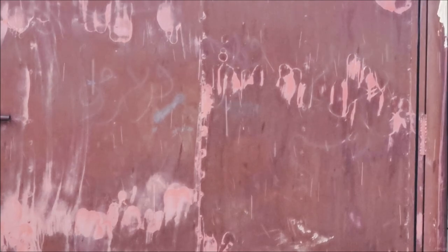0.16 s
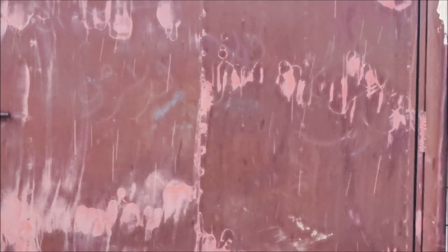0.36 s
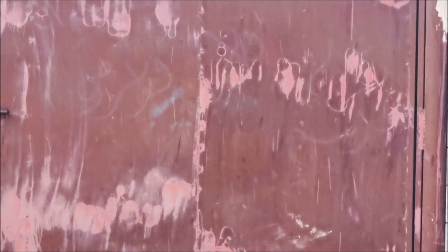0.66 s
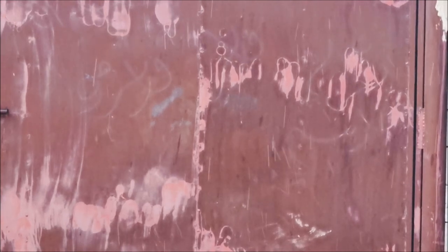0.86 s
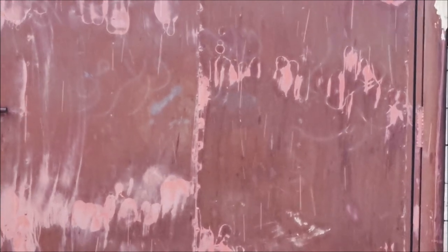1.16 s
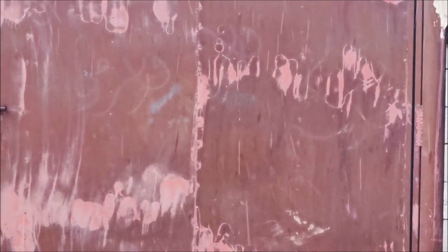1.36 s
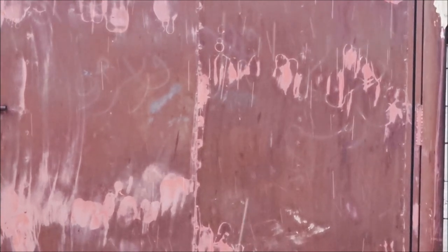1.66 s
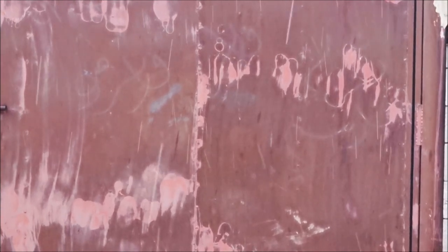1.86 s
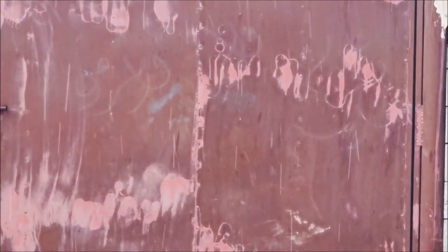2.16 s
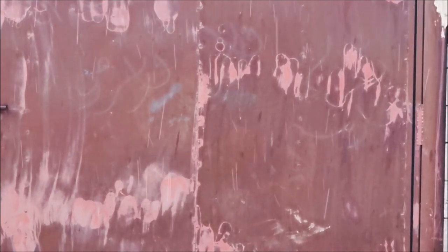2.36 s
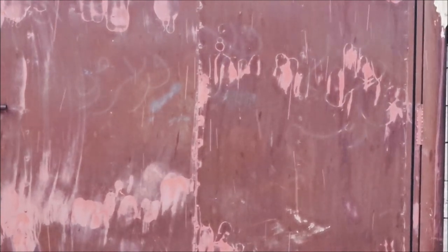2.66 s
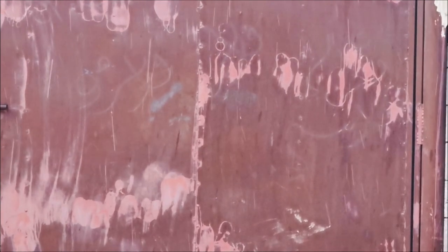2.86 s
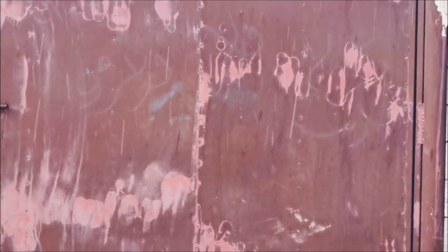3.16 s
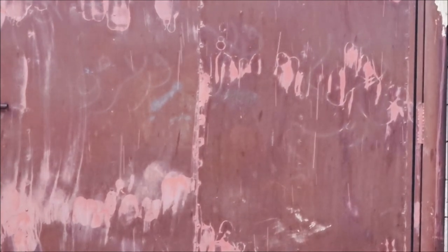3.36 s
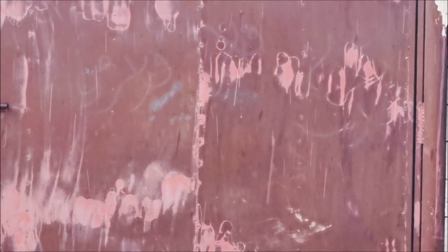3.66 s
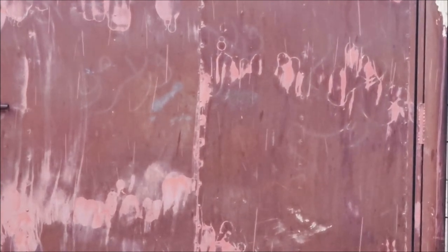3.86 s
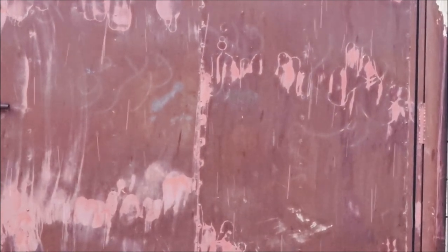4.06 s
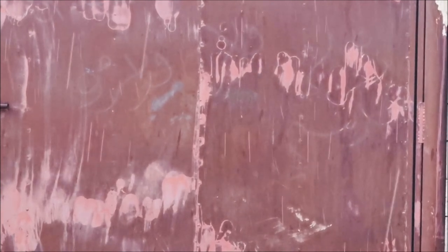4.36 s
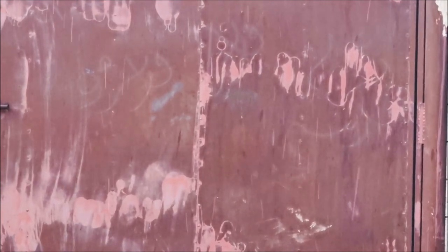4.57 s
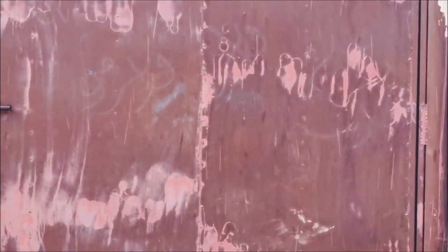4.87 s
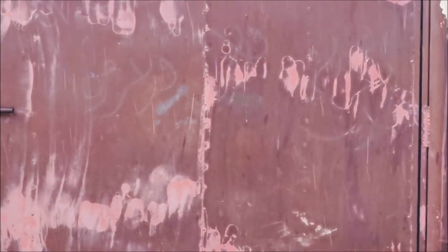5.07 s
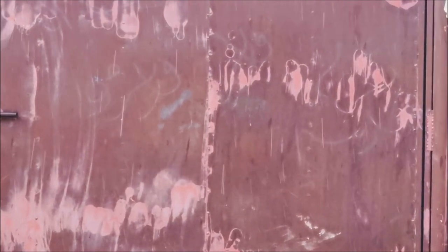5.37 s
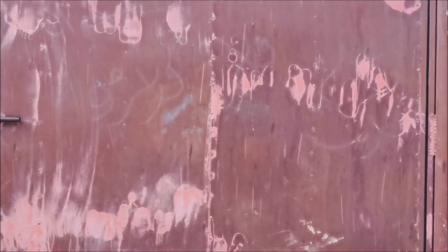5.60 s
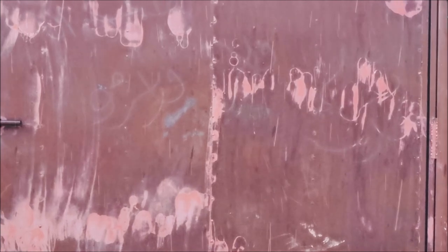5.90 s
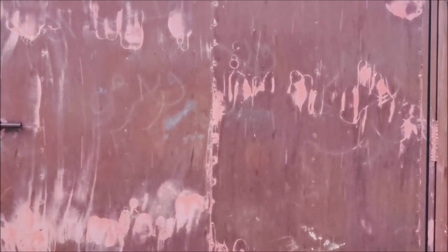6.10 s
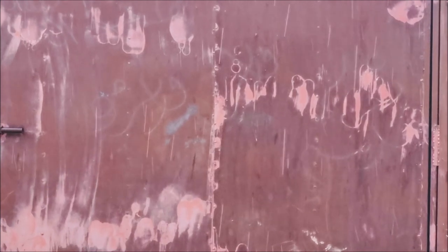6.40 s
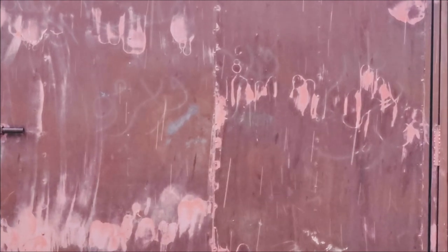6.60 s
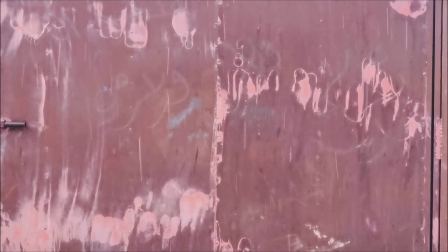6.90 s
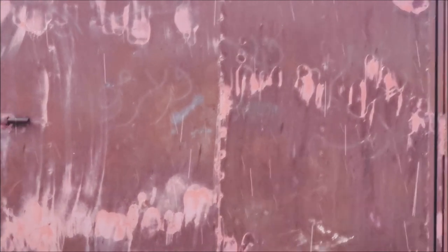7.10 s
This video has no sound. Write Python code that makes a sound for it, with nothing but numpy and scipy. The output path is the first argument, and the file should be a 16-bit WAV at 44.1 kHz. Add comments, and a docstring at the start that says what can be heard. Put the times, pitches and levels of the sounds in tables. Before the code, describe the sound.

Rain strikes a large metal sheet outdoors, close to a stereo microphone. Dense small drops splatter in uneven surges while larger ones drum, ping and thud. Soft wind rumbles on the microphone and a few thin chirps pass faintly behind. The rain drifts from the right towards the front, gaining a metallic sizzle and deeper drumming, then stops abruptly after about seven seconds.

```python
"""A burst of rain patters on a large metal sheet, close to a stereo microphone outdoors. Dense small drops
splat and come in lashes, larger ones drum the sheet's resonances, and single drops ping or thud, with
a slap off a nearby wall. The rain drifts from the side towards the front. Wind rumbles on the
microphone ports, a few thin chirps pass over a faint wash and hum, and everything stops abruptly."""
import sys
import numpy as np
from scipy import signal
from scipy.fft import rfft, irfft, next_fast_len
from scipy.io import wavfile
from scipy.ndimage import uniform_filter1d, map_coordinates

SR = 44100
rng = np.random.default_rng(int(sys.argv[2]) if len(sys.argv) > 2 else 0)


def wrap_up_sound(samples):
    """Save the sound to the file named by the first command line argument, as 16-bit audio."""
    columns = np.atleast_2d(samples).T
    # keep every value between -1 and 1, then stretch to whole-number steps
    tamed = np.clip(columns, -1, 1)
    steps = np.round(tamed * 32767).astype(np.int16)
    wavfile.write(sys.argv[1], SR, steps)


N = 319398
TIME = np.arange(N) / SR
STOP_S = 7.13

# spectrum of the open air around the microphone: f/Hz, level/dB
AIR_SPECTRUM = [(30, 5), (90, 1.5), (140, -4.5), (190, -2), (250, -7), (330, -5), (600, -13), (1500, -11),
                (8000, -30.5)]
# a low hum that swells and fades: t/s, level/dB
HUM_LEVEL = [(0, -74), (.25, -54.5), (.55, -49), (.7, -61), (1.1, -59), (1.8, -62.5), (2.3, -58.5),
             (3, -62.5), (5, -61), (7.1, -74)]
# wind on the microphone: t/s, level/dB
WIND_LEVEL = [(0.0, -41.5), (0.9, -41.5), (1.02, -39.5), (1.14, -30.5), (1.22, -41), (1.6, -46.5),
              (2.2, -52), (3.7, -58), (5.3, -59), (5.85, -44), (6.4, -51.5), (7.1, -47)]
# spectrum of the wind's rumble at the ports: f/Hz, level/dB
WIND_SPECTRUM = [(10, -14), (30, 0.5), (55, -5), (90, -14.5), (150, -28), (400, -60.5), (1500, -100)]
# thin chirps: t/s, length/s, start f/Hz, middle f/Hz, end f/Hz, level/dB
CHIRPS = [(1.036, .062, 2560, 2760, 2670, -31), (1.09, .04, 2750, 2750, 2730, -42),
          (1.11, .07, 2560, 2330, 2290, -44), (2.575, .095, 1480, 1405, 1330, -40.5),
          (6.757, .055, 3100, 3060, 2970, -38.5), (6.808, .038, 2970, 2850, 2730, -38.5)]

# where the rain strikes: t/s, right-channel lag of patter/ms, of drumming/ms, turn (side 0, front 1)
RAIN_BEARING = [(0, 0.52, 0.62, 0.011), (2.7, 0.48, 0.57, 0.17), (4.3, 0.27, 0.32, 0.67),
                (5.2, 0.29, 0.28, 0.9), (6, 0.24, 0.21, 0.9), (7.1, 0.26, 0.3, 0.99)]
# lashes of rain thrown against the sheet: t/s, length/s, level/dB
RAIN_LASHES = [(0, 0.073, -41.5), (0.223, 0.044, -30.5), (0.636, 0.11, -32.5), (0.763, 0.11, -34.5),
               (0.908, 0.14, -34.5), (1.206, 0.38, -34), (2.313, 0.11, -43.5), (2.86, 0.24, -36),
               (3.297, 0.12, -35.5), (3.558, 0.23, -35), (3.918, 0.17, -32.5), (4.218, 0.059, -37),
               (4.49, 0.21, -37), (5.154, 0.28, -36), (5.862, 0.4, -39)]
# steady fall of large drops: t/s, level/dB
LARGE_DROP_LEVEL = [(0.0, -40.5), (0.5, -41.5), (1.15, -42), (1.55, -40.5), (1.7, -34.5), (1.85, -40.5),
                    (2.1, -56), (2.8, -50.5), (2.95, -40.5), (3.02, -37), (3.2, -47), (3.85, -46.5),
                    (4.05, -39), (4.35, -42.5), (4.75, -40.5), (5.2, -38.5), (5.7, -45.5), (6.2, -43.5),
                    (6.8, -48), (7.1, -50.5)]
# modes of the wet sheet, to the side of the microphone and in front: f/Hz, width/Hz, level/dB
SIDE_MODES = [(144, 73, -13), (348, 120, -6.5), (494, 59, 4), (700, 220, -6), (1270, 500, -9)]
FRONT_MODES = [(144, 72, -11.5), (329.7, 57, -3), (466, 46, 3), (678, 167, -3), (1280, 460, -6.5)]
# the loudest heavy drops that flex the sheet: t/s, level/dB, f/Hz, t60/s, relative clang/dB
HEAVY_DROPS = [(1.676, -25, 458, 0.086, 21), (3.403, -27, 480, 0.084, -9), (3.414, -18.5, 478, 0.042, -12),
               (3.479, -33, 433, 0.081, -21), (3.511, -30, 500, 0.036, -14), (3.546, -32, 484, 0.052, -18),
               (3.704, -29, 646, 0.07, -16), (3.869, -24, 453, 0.015, -13), (4.0095, -18.5, 560, 0.024, 8),
               (4.030, -26, 600, 0.021, 3), (4.677, -43, 468, 0.024, -15), (4.791, -33, 470, 0.037, -14),
               (5.002, -28, 336, 0.064, 14), (5.076, -19.5, 510, 0.021, -4), (5.138, -18, 480, 0.013, -2),
               (5.181, -27, 334, 0.047, -11), (5.196, -26, 443, .04, -12), (5.261, -19, 366, 0.02, -15),
               (5.418, -34, 400, 0.023, 5), (5.436, -21.5, 490, 0.027, 3), (5.950, -29, 477, 0.043, -12),
               (6.025, -27.5, 470, 0.042, -9), (6.126, -28, 447, 0.056, 5),
               (6.127, -18.5, 1095, 0.034, -12), (6.152, -24, 1020, 0.036, 1), (6.176, -29, 633, 0.034, -9),
               (6.226, -30, 494, 0.063, -17), (6.274, -30.5, 489, 0.09, -17), (6.369, -28, 523, 0.029, -19),
               (7.101, -19.5, 434, 0.016, -21)]
# the loudest drops near the microphone; a few rows sound shortly after louder ones: t/s, level/dB, f/Hz, #
# contact hardness/dB, ring t60/s
NEAR_DROPS = [(.035, -20.5, 2770, -7, .015), (.058, -14, 2304, 2, 0.013), (.090, -19, 3420, 0.5, 0.019),
              (.1437, -20.5, 2170, 5, 0.0089), (.200, -22, 2600, 0.5, 0.013), (.254, -18.5, 3240, 0, 0.014),
              (.269, -15.5, 3020, -9, 0.014), (.296, -23.5, 2190, 3, 0.012),
              (.316, -17.5, 3300, 7.5, 0.0083), (.348, -20.5, 3260, -4, 0.013),
              (.372, -8, 1913, -4.5, 0.021), (.4275, -19, 2820, -2, 0.012), (.580, -21, 1600, 6, .014),
              (.604, -21, 2770, -5, .02), (.668, -16.5, 3210, 3.5, 0.0099), (.676, -22, 3580, 9.5, .01),
              (.686, -18, 4600, -1, .012), (.694, -19, 3100, 2.5, .012), (.715, -20.5, 3010, 6.5, 0.01),
              (.7404, -19.5, 2990, -6, 0.013), (.7785, -11, 2980, -7, 0.0087), (.795, -28.5, 3960, 1, 0.01),
              (.816, -17.5, 4750, 3, .012), (.821, -23.5, 3420, 5, 0.0087), (.843, -22.5, 4810, -2.5, .015),
              (.924, -21, 3240, 2, 0.011), (.973, -23.5, 3280, -3, 0.012), (1.043, -21.5, 4500, -5.5, .015),
              (1.153, -30, 2660, -11.5, 0.031), (1.198, -24, 2770, -9.5, 0.016),
              (1.2215, -18, 2080, -6.5, 0.025), (1.2245, -19, 2920, -1, .015), (1.277, -26, 3400, 6, .015),
              (1.308, -22, 3430, -2, .015), (1.508, -21.5, 2210, -1, 0.025),
              (1.615, -16.5, 2720, -0.5, 0.017), (1.676, -13.5, 2760, -9.5, .015),
              (1.785, -20.5, 3500, 3.5, 0.0084), (1.807, -23, 3460, 1.5, 0.017),
              (1.999, -27.5, 3440, -1, 0.011), (2.082, -17, 3280, -2.5, 0.0088),
              (2.1615, -21, 2690, -6, .018), (2.215, -23, 3470, -2, 0.019), (2.265, -26, 4320, 0.5, 0.0083),
              (2.315, -24.5, 2480, -5, .02), (2.334, -21, 1900, 4, 0.0088), (2.390, -20, 3420, -4, .018),
              (2.419, -21, 3350, 6.5, .015), (2.436, -27, 3010, 5, .008), (2.498, -17, 2240, 8, 0.0089),
              (2.650, -18.5, 2200, 7, 0.0088), (2.697, -18, 2900, 3, 0.013), (2.750, -29, 2650, -2, 0.018),
              (2.790, -22, 2790, -1, .015), (2.836, -22, 4630, -1, 0.014), (2.880, -14.5, 2850, 4, 0.012),
              (2.9523, -18, 3340, 2.5, .015), (3.012, -29, 2220, 2, .015), (3.074, -17.5, 3410, 5, 0.011),
              (3.193, -31, 3000, -5, 0.013), (3.324, -19, 3070, -2.5, 0.0084),
              (3.348, -17.5, 3490, 0, 0.014), (3.366, -22.5, 2920, 9, 0.011),
              (3.432, -20.5, 3310, 4, 0.024), (3.4515, -18.5, 3300, 6.5, 0.013),
              (3.570, -21, 2090, -6, .025), (3.5783, -24.5, 2560, 9, .012), (3.6656, -4, 6610, 0, 0.0064),
              (3.684, -16.5, 2130, -4, 0.02), (3.718, -15, 2700, 8.5, 0.0082), (3.756, -25, 2090, 10, .01),
              (3.969, -21, 4110, 5, .01), (4.115, -18, 4330, -0.5, .015), (4.2365, -18.5, 3880, 4, 0.0087),
              (4.250, -21, 4220, 2, 0.014), (4.360, -20, 4360, -12.5, 0.039), (4.4643, -22, 5010, 1, 0.011),
              (4.632, -19, 5270, -4, .015), (4.661, -21, 2600, 4.5, 0.02),
              (4.8115, -19.5, 4240, 2.5, 0.0058), (4.8205, -17.5, 2400, -0.5, 0.019),
              (5.196, -25.5, 5430, -1, 0.016), (5.2485, -22.5, 5760, -3.5, .018),
              (5.566, -16.5, 2130, 2, 0.014), (5.6495, -14, 5160, -4.5, .018),
              (5.662, -19, 4060, 3, 0.0073), (5.903, -17.5, 2160, -1, 0.019), (5.9405, -23, 2200, -4, .018),
              (6.147, -17.5, 5320, 0, 0.011), (6.180, -18, 2420, -1, .015), (6.2285, -16, 5400, 4.5, 0.01),
              (6.7305, -10.5, 2840, 1.5, 0.016), (6.7443, -15, 4270, 1.5, .013),
              (7.009, -22.5, 5230, -2, .018)]
# steady fall of small drops: t/s, level/dB
SMALL_DROP_LEVEL = [(0.0, -29), (0.55, -41), (1.15, -41.5), (1.75, -35.5), (2.0, -46.5), (2.6, -39),
                    (3.2, -35.5), (3.45, -35.5), (3.65, -34), (4.4, -38.5), (4.78, -37), (5.0, -36.5),
                    (5.6, -38), (5.83, -40.5), (6.4, -36), (6.9, -41.5), (7.1, -39)]
# colour of the patter from the side and from the front: f/Hz, left level/dB, right level/dB
SIDE_COLOUR = [(925, -17.5, -5.5), (1265, -2, -2), (1644, -15, -18.5), (1844, -1.5, -6), (2600, -18.5, -5),
               (2670, -15.5, 2), (3680, -15.5, 0.5), (3640, -14, -15), (4630, -0.5, -8), (5300, -30.5, 0),
               (6230, -8, -2.5), (8470, -12, -3), (8600, -28, -13.5)]
FRONT_COLOUR = [(830, -7.5, -16.5), (1338, -6.5, -2), (1570, -17.5, -10), (2150, -9.5, 3), (2660, -16, -7),
                (2800, -20, -7.5), (3700, -2, -2), (4030, -13.5, 0), (5300, -9, -7), (4860, -19.5, -8),
                (6630, -19.5, 4), (6500, -9, -2.5), (9000, -22, -7)]
# high modes of the sheet in front of the microphone: f/Hz, width/Hz, level/dB
SIZZLE_MODES = [(1091, 140, -1.5), (2685, 560, 2), (5426, 304, 6.5)]
# treble relative to the rest of the patter: t/s, level/dB
TREBLE_LEVEL = [(0, -1), (.4, -5.5), (.69, -3.5), (1.02, -4), (1.15, -19), (1.36, -2), (1.53, -2.5),
                (1.68, -9), (2.3, -7), (2.6, 2), (3.2, -3.5), (5.3, 1.5), (7.1, -1)]


def amp(db):
    """Decibels to gain."""
    return 10 ** (np.asarray(db) / 20)


def unit(x):
    """Scale to rms 1."""
    return x / np.sqrt(np.mean(x ** 2) + 1e-20)


def curves(rows):
    """One value per sample for each column after the time."""
    times, *columns = np.transpose(rows)
    return [np.interp(TIME, times, column) for column in columns]


def gains(spectrum, hz):
    """Gain for each dB column of a spectrum, read on a log axis."""
    knots_hz, *columns = np.transpose(spectrum)
    return amp([np.interp(np.log(hz + 1), np.log(knots_hz), column) for column in columns])


def wobble(rate):
    """A smooth random curve, rate knots a second."""
    return map_coordinates(rng.standard_normal(int(N * rate / SR) + 4), [TIME * rate])


def filtered(x, response):
    """Filter x by a response given as a function of frequency."""
    size = 2 * next_fast_len((N + SR // 2) // 2)
    return irfft(rfft(x, size) * response(np.fft.rfftfreq(size, 1 / SR)), size)[..., :N]


def above(hz, edge_hz, order=4):
    """Gain of a high-pass."""
    return np.sqrt(1 - 1 / (1 + (hz / edge_hz) ** (2 * order)))


def causal(gain):
    """The minimum-phase response with this gain: it rings only after a blow."""
    cepstrum = irfft(np.log(np.maximum(gain, 1e-5)))
    half = cepstrum.shape[-1] // 2
    fold = np.r_[1, np.full(half - 1, 2), 1, np.zeros(half - 1)]
    return np.exp(rfft(cepstrum * fold))


def resonances(modes, hz):
    """Response of a few damped modes; neighbours swing in opposite directions."""
    return sum((-1) ** k * amp(db) * 1j * hz * width / (centre ** 2 - hz ** 2 + 1j * hz * width)
               for k, (centre, width, db) in enumerate(modes))


def rings(starts, sizes, pitches, t60, samples):
    """One damped sine for each drop."""
    age = np.arange(samples) / SR
    decay = amp(-60 * age / np.reshape(t60, (-1, 1)))
    waves = sizes[:, None] * np.sin(2 * np.pi * pitches[:, None] * age) * decay
    where = (starts * SR).astype(int)[:, None] + np.arange(samples)
    return np.bincount(where.ravel(), waves.ravel(), N)[:N]


def shower(rate, size_db, pitch_hz, octaves, cycles, samples):
    """Random drops, rate a second: many small, few large, each ringing briefly at its own pitch."""
    when, rank, up, down = rng.random((int(rate * N / SR), 4)).T
    sizes = amp(size_db * np.minimum(-np.log(1 - rank), 3.5)) * rng.choice([-1, 1], len(when))
    pitches = pitch_hz * 2 ** (octaves * (up - down))
    return unit(rings(when * N / SR, sizes, pitches, cycles / pitches, samples))


def stray_drops(level, rate, over_db, scatter_db, pitch_hz, octaves, bright_db):
    """Single drops at random times, sized by the rain's level: t/s, level/dB, f/Hz, brightness/dB."""
    when, size, pitch, bright = rng.random((int(rate * STOP_S), 4)).T
    starts = when * STOP_S
    db = 20 * np.log10(np.interp(starts, TIME, level)) + over_db + scatter_db * (2 * size - 1)
    hz = pitch_hz * 2 ** (octaves * (2 * pitch - 1))
    return np.transpose([starts, db, hz, bright_db + scatter_db * (2 * bright - 1)])


def stereo_mic(x, lag_ms, splash_db, splash_t60):
    """A sound reaches the right capsule late and trails a noisy splash that differs left and right."""
    late = map_coordinates(x, [np.arange(N) - lag_ms * SR / 1000])
    energy_decay = amp(-120 / (splash_t60 * SR))
    trail = np.sqrt(np.abs(signal.lfilter([1 - energy_decay], [1, -energy_decay], x ** 2)))
    return np.array([x, late]) + amp(splash_db) * trail * rng.standard_normal((2, N))


def direction_colour(pair, low_cut_hz):
    """The treble takes the colour of the direction from which it meets the microphone."""
    turn = curves(RAIN_BEARING)[2]
    side = filtered(pair, lambda hz: causal(gains(SIDE_COLOUR, hz) * above(hz, low_cut_hz)))
    front = filtered(pair, lambda hz: causal(gains(FRONT_COLOUR, hz) * above(hz, low_cut_hz)))
    return (1 - turn) * side + turn * front


def spot_colour(pair, depth_db):
    """Each spot on the sheet favours other pitches, so the colour keeps shifting."""
    spectra = signal.stft(pair, nperseg=512)[2]
    across_pitch = uniform_filter1d(rng.standard_normal(spectra.shape[1:]), size=4, axis=0)
    patches = uniform_filter1d(across_pitch, size=16, axis=1)
    return signal.istft(spectra * amp(depth_db * unit(patches)), nperseg=512)[1][:, :N]


def wall_slap(pair, echo_db):
    """Add one echo off a wall about three metres away; its delay varies a little from spot to spot."""
    delay_s = .0184 + .0003 * wobble(10)
    echo = np.array([np.interp(TIME - delay_s, TIME, channel, left=0) for channel in pair])
    return pair + amp(echo_db) * echo


def background():
    """A steady outdoor wash, much alike in both channels, with a narrow low hum."""
    noise = rng.standard_normal(N) + amp(-9.5) * rng.standard_normal((2, N))
    wash = unit(filtered(noise, lambda hz: gains(AIR_SPECTRUM, hz)))
    hum_hz, width_hz = 143, 11
    hum = unit(filtered(rng.standard_normal(N), lambda hz: np.exp(-((hz - hum_hz) / width_hz) ** 2)))
    return amp(-53.5) * wash + amp(curves(HUM_LEVEL)[0]) * hum


def wind():
    """Wind softly buffets the microphone, mostly on the left port."""
    each_port = rng.standard_normal((2, N)) * amp([[0], [-17]])
    both_ports = amp(-20.5) * rng.standard_normal(N)
    rumble = unit(filtered(each_port + both_ports, lambda hz: gains(WIND_SPECTRUM, hz)))
    buffet_db = 4 * wobble(13)
    return amp(curves(WIND_LEVEL)[0] + buffet_db) * rumble


def chirps():
    """Faint whistles to the right, perhaps a small bird: each wavers along a short, curved glide."""
    song = np.zeros(N)
    fade_share = .27
    for start, length, start_hz, middle_hz, end_hz, db in CHIRPS:
        progress = np.clip((TIME - start) / length, 0, 1)
        glide = np.polyval(np.polyfit([0, .5, 1], [start_hz, middle_hz, end_hz], 2), progress)
        hz = glide * (1 + .013 * wobble(400))
        shape = np.clip(np.minimum(progress, 1 - progress) / fade_share, 0, 1)
        song += amp(db + 2.2 * wobble(160)) * shape * np.sin(2 * np.pi * np.cumsum(hz) / SR)
    pair = stereo_mic(song, lag_ms=.26, splash_db=-14, splash_t60=.02)
    return wall_slap(pair, echo_db=-5) * amp([[-3], [1.5]])


def lashes():
    """Amplitude of the rain thrown against the sheet: each lash rises fast, holds, then dies away."""
    attack_s, release_s = .024, .026
    start, length, db = np.transpose(RAIN_LASHES)[:, :, None]
    age = TIME - start
    shape = np.clip(age / attack_s, 0, 1) * np.exp(-np.clip((age - length) / release_s, 0, 20))
    return np.linalg.norm(amp(db) * shape, axis=0)


def thuds(level):
    """Heavy drops flex the sheet: a dull ring under a short clang of its higher modes."""
    strays = stray_drops(level, rate=3, over_db=5, scatter_db=4, pitch_hz=480, octaves=.2, bright_db=-11)
    strays = np.insert(strays, 3, .04, axis=1)  # t60/s
    starts, db, pitch_hz, t60, clang_db = np.vstack([HEAVY_DROPS, strays]).T
    hits = rings(starts, amp(db), pitch_hz, t60, samples=2500)
    for offset in rng.uniform(-1.1, 1, (6, len(starts))):
        mode_hz = 1050 * 2 ** (.9 * offset)
        sizes = amp(db + clang_db - 15.5) * rng.choice([-1, 1], len(starts))
        hits += rings(starts, sizes, mode_hz, t60=.018, samples=1500)
    pair = stereo_mic(hits, lag_ms=curves(RAIN_BEARING)[1], splash_db=-2, splash_t60=.03)
    pair = filtered(pair, lambda hz: causal(above(hz, 252) * (1 - above(hz, 1500, order=2) ** 2)))
    return wall_slap(pair, echo_db=-9)


def drumming(level):
    """Larger drops excite the sheet's broad, water-damped resonances; it booms deeper at the front."""
    _, lag_ms, turn = curves(RAIN_BEARING)
    impacts = shower(rate=520, size_db=-.5, pitch_hz=1100, octaves=.68, cycles=1.1, samples=300)
    pair = stereo_mic(impacts, lag_ms, splash_db=5, splash_t60=.03)
    side = filtered(pair, lambda hz: resonances(SIDE_MODES, hz))
    front = filtered(pair, lambda hz: resonances(FRONT_MODES, hz))
    sheet = side + np.sqrt(turn) * (front - side)
    upper = filtered(sheet, lambda hz: above(hz, 377) ** 2)
    boom = amp(-4 + 9.9 * turn) * (sheet - upper)
    return level * unit(spot_colour(upper + boom, depth_db=2)) * amp([[-1], [.8]])


def pings(level):
    """Drops close to the microphone: a sharp contact, a metallic ring, then scattering droplets."""
    strays = stray_drops(level, rate=4, over_db=6.5, scatter_db=2, pitch_hz=3240, octaves=.7,
                         bright_db=0)
    strays = np.insert(strays, 4, .015, axis=1)  # t60/s
    starts, db, pitch_hz, hard_db, t60 = np.vstack([NEAR_DROPS, strays]).T
    lag_ms = curves(RAIN_BEARING)[0]
    contact = rings(starts, amp(db + hard_db + 7), np.full(len(starts), 5000), t60=.0009, samples=200)
    ring = rings(starts, amp(db - 3.5), pitch_hz, t60, samples=1500)
    scatter_s = .0013 * 2 ** (-np.maximum(hard_db, -6) / 8)  # longer after a soft contact
    droplets = np.zeros(N)
    for delay, detune in rng.standard_normal((7, 2, len(starts))):
        landings = starts + scatter_s * np.minimum(np.abs(delay), 2)
        droplet_hz = pitch_hz * 2 ** (.1 + .42 * detune)
        droplets += rings(landings, amp(db - 10.5), droplet_hz, t60=.017, samples=700)
    splash = stereo_mic(contact + droplets, lag_ms, splash_db=-2, splash_t60=.024)
    tone = stereo_mic(ring, lag_ms, splash_db=-9, splash_t60=.018)
    tone = filtered(tone, lambda hz: causal(above(hz, 1600))) * amp([[-5], [0]])
    return wall_slap(direction_colour(splash, low_cut_hz=1400) + tone, echo_db=-11)


def patter(level):
    """Small drops splat near and far; towards the front they merge into a metallic sizzle."""
    lag_ms, _, turn = curves(RAIN_BEARING)
    near = shower(rate=750, size_db=6, pitch_hz=4020, octaves=1.97, cycles=8.7, samples=500)
    far = shower(rate=3500, size_db=4, pitch_hz=3560, octaves=1.7, cycles=2.3, samples=100)
    impacts = amp(-1.2 * turn) * near + amp(turn) * far
    splats = stereo_mic(impacts, lag_ms, splash_db=2, splash_t60=.022)
    splats = direction_colour(splats, low_cut_hz=1040)
    # the finest drops keep the sheet's high resonances sounding
    fine = shower(rate=2500, size_db=3, pitch_hz=3600, octaves=2.17, cycles=1.4, samples=100)
    spray = stereo_mic(fine, lag_ms, splash_db=7, splash_t60=.02)
    sizzle = filtered(spray, lambda hz: resonances(SIZZLE_MODES, hz)) * amp([[-10], [3]])
    pair = unit(spot_colour(splats + turn ** 2 * sizzle, depth_db=2.5))
    # the patter turns brighter and duller
    treble = filtered(pair, lambda hz: above(hz, 5040) ** 2)
    pair = pair - treble + amp(curves(TREBLE_LEVEL)[0]) * treble
    return wall_slap(level * pair, echo_db=-12)


def scene():
    """A steady fall and sudden lashes drive the patter and drumming; single drops stand out of both."""
    lash = lashes()
    flutter_db = .74 * wobble(14)  # chance unevenness of the fall
    small = np.hypot(amp(curves(SMALL_DROP_LEVEL)[0]), lash) * amp(flutter_db)
    large = np.hypot(amp(curves(LARGE_DROP_LEVEL)[0]), amp(-10.5) * lash)
    rain = patter(small) + drumming(large) + pings(small) + thuds(large)
    return rain + chirps() + wind() + background()


def record(dry):
    """The sound stops short, and a steep low-pass takes off the top of the treble."""
    fade_s, top_hz = .002, 8640
    gate = np.clip((STOP_S - TIME) / fade_s, 0, 1)
    return filtered(dry * gate, lambda hz: 1 - above(hz, top_hz, order=70) ** 2)


dry = scene()
out = record(dry)
wrap_up_sound(out)
```